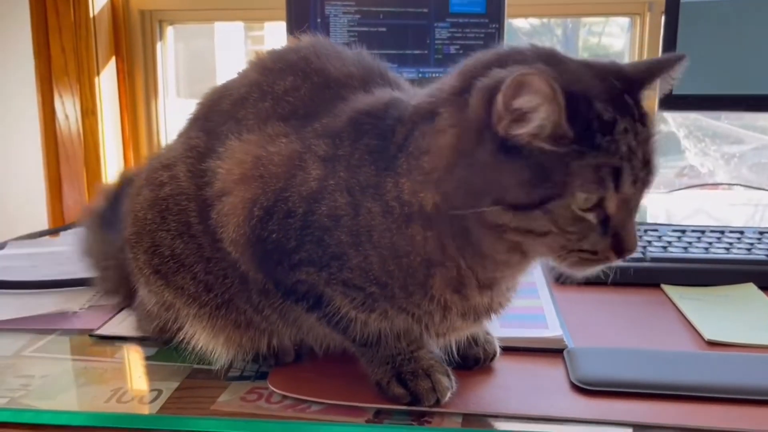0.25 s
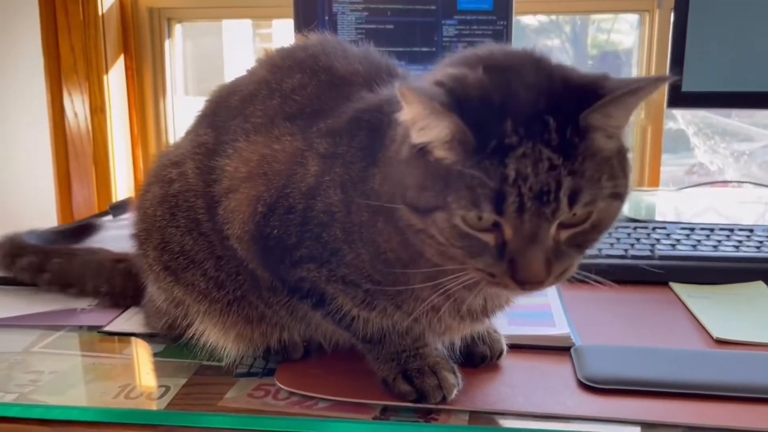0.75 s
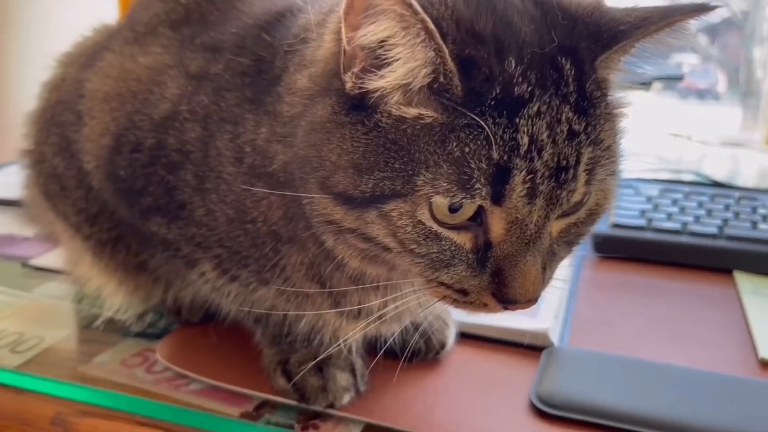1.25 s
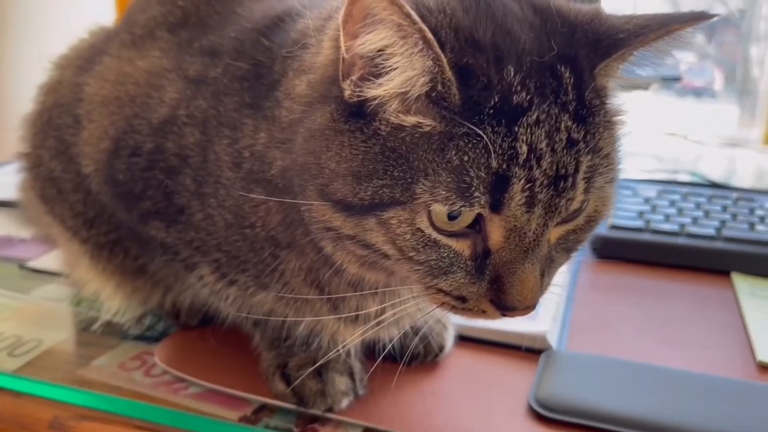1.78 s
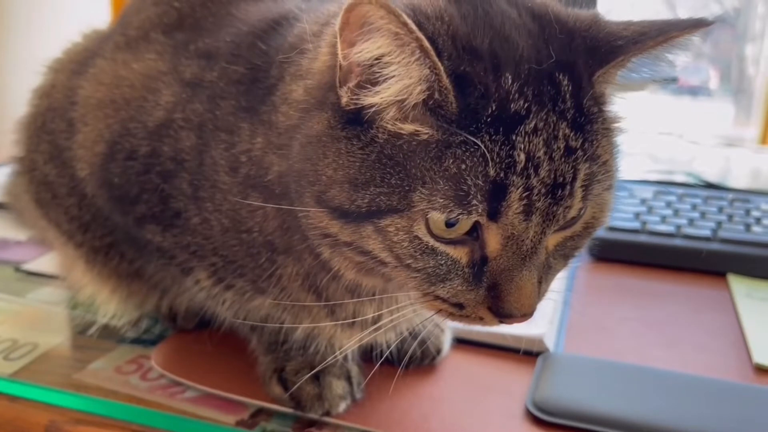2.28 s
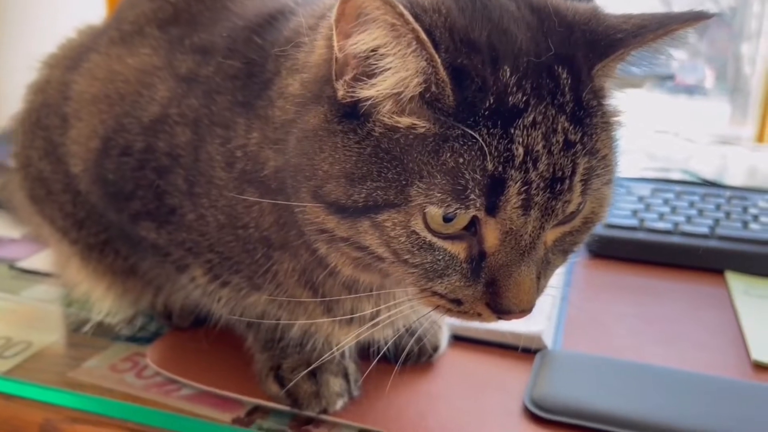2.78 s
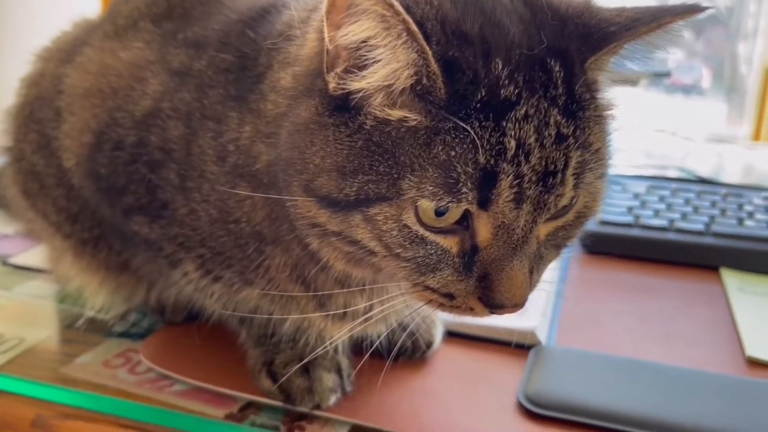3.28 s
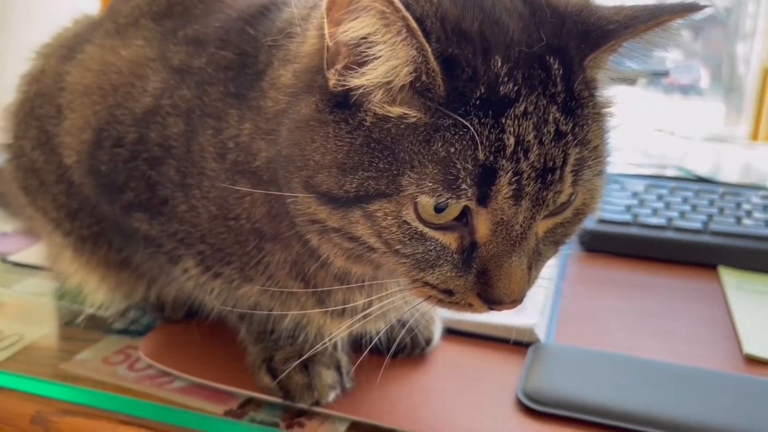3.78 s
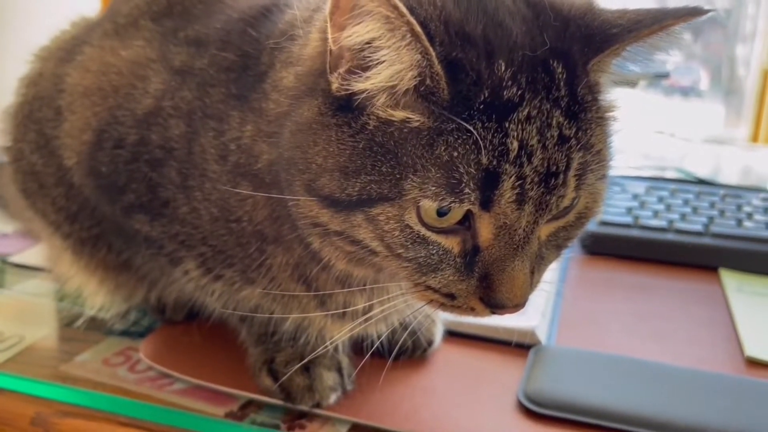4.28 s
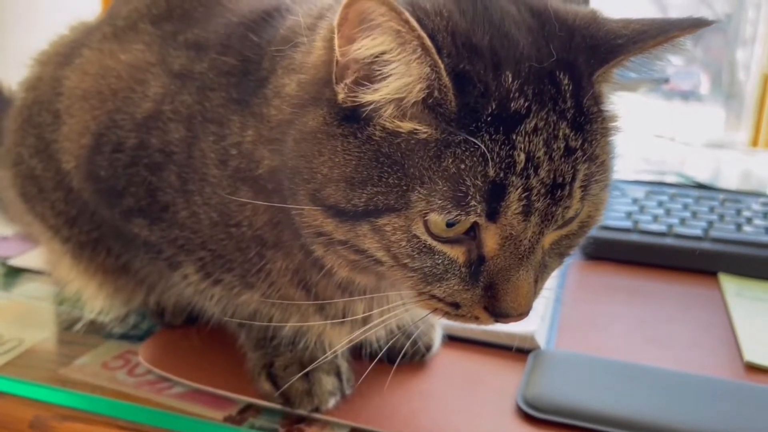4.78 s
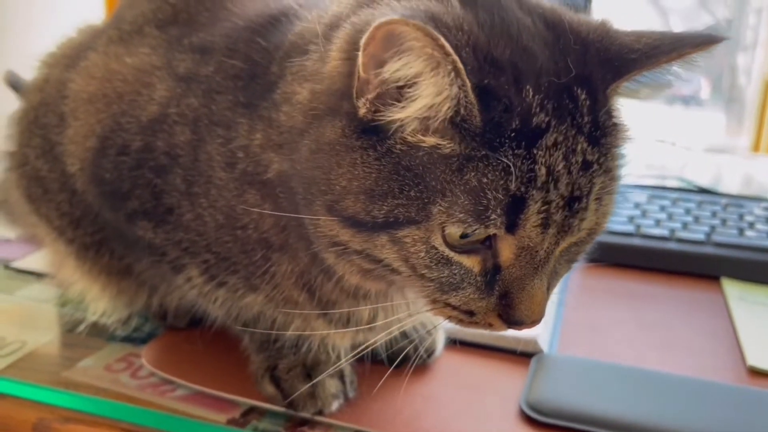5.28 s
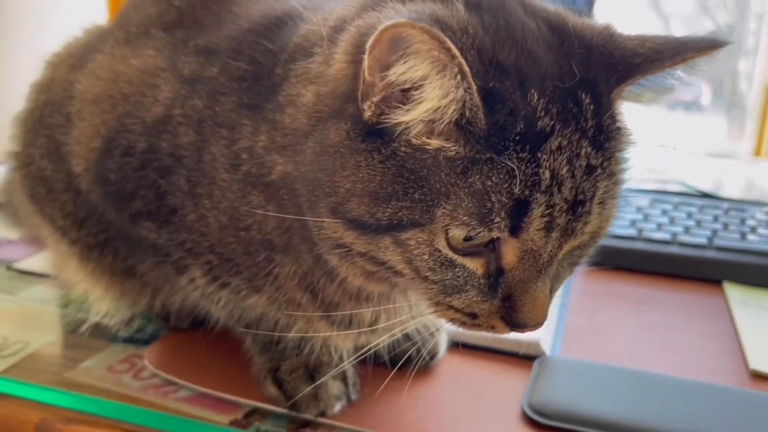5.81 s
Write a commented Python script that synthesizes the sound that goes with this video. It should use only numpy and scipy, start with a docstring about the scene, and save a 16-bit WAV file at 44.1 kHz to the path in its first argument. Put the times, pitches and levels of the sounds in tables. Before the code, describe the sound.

Indoors, heard from very near, a cat's low, fluttering purr rises and falls with its breathing. Fuller, rumbling out-breaths alternate three times with lighter in-breaths that hiss through the nose, above a faint room rumble. The sound cuts out for an instant early on. At the close come a dull bump and a short, grainy scrape that rings briefly, the loudest sound of all.

```python
"""A cat purring on a desk

Close to the microphone, the glottis opens and shuts about 26 times a second; each pulse excites the airway.
Outwards the purr is a deep throb; inwards it is softer, and turbulent puffs hiss through the nose.
Near the end come a soft thump and a loud scuff, both with damped ringing.
Fur rustles faintly over a low room rumble, and twice the sound drops out for a moment."""
import sys
import numpy as np
from scipy import signal
from scipy.fft import rfft, irfft, next_fast_len
from scipy.io import wavfile
from scipy.ndimage import uniform_filter1d, map_coordinates

SR = 44100
rng = np.random.default_rng(int(sys.argv[2]) if len(sys.argv) > 2 else 0)


def generate_wav(sig):
    """Save sig (samples, or channels by samples) to the path in sys.argv[1] as 16-bit PCM at SR."""
    pcm = np.round(np.clip(np.atleast_2d(sig).T, -1, 1) * 32767).astype(np.int16)
    wavfile.write(sys.argv[1], SR, pcm)


N = 266805
TIME = np.arange(N) / SR


# outward runs: first closure t/s, rate/Hz, cycles, relative chest and throat level/dB, swell depth/dB
OUTWARD_RUNS = [(.021, 25.35, 21, -63.2, -67.3, 4), (1.432, 25.05, 29, -54.7, -57.8, 6.5),
                (3.636, 25.37, 29, -54.2, -57.2, 10)]
# inward runs: first closure t/s, rate/Hz, cycles, relative chest, throat and hiss level/dB,
# full flow, fade and cut-off t/s after that closure, top whistle f/Hz, relative whistle and sibilance level/dB
INWARD_RUNS = [(.870, 25.8, 14, -58.5, -64.5, -65, -.01, .2, .46, 4210, -2.5, -8),
               (2.608, 25.8, 26, -59, -64.3, -61.7, .075, .3, .9, 4350, -1, -9),
               (4.797, 26.25, 27, -59.7, -65.3, -64.8, .115, .61, .78, 4420, -4, -1.5)]

def purr():
    """Source and filter: glottal pulses drive the body; the chest carries the bass, the throat the rest."""
    outward = [closures(run) for run in OUTWARD_RUNS]
    inward = [closures(run) for run in INWARD_RUNS]
    effort = np.vstack([*map(effort_out, OUTWARD_RUNS, outward), *map(effort_in, INWARD_RUNS, inward)])
    surge = amp(5.2 * bell(TIME - 0.477, width=0.03))
    chest, throat = surge * gains(effort[np.argsort(effort[:, 0])])
    throb = filtered(sum(map(throb_out, outward)) + sum(map(throb_in, inward)), body)
    bass = lowpass(throb, hz=170, power=8)
    voice = amp(-1.3) * chest * unit(bass) + amp(-1.34) * throat * unit(throb - bass)
    ticking = amp(-55.5) * np.sqrt(throat) * sum(map(fold_ticks, outward))
    breath = amp(-29.5) * throat * sum(map(sigh, outward))
    return voice + ticking + breath + hums() + sum(map(nose_hiss, INWARD_RUNS, inward))


def closures(run, jitter_s=0.00066):
    """Quasi-periodic oscillation: the times at which the folds shut, slightly uneven."""
    start, rate, count = run[:3]
    return start + np.arange(round(count)) / rate + jitter_s * rng.standard_normal(round(count))


def effort_out(run, t, crest=0.62, sag_db=3, throat_swing=1.64):
    """Amplitude envelope that swells, then sags: rows of t/s, chest level/dB, throat level/dB."""
    chest_db, throat_db, swell_db = run[3:]
    share, length = progress(run, t)
    rising = swell_db * (1 - share / crest) ** 2
    sagging = sag_db * ((share - crest) / (1 - crest)) ** 2
    soft_ends = edge(share * length, 0.19) + edge((1 - share) * length, 0.1)
    drop_db = np.where(share < crest, rising, sagging) + 5.5 * soft_ends
    return np.column_stack([t, chest_db - drop_db, throat_db - throat_swing * drop_db])


def effort_in(run, t, floor_db=-11):
    """Amplitude as a power law of airflow: rows of t/s, chest level/dB, throat level/dB."""
    chest_db, throat_db = run[3:5]
    flow_db = np.maximum(airflow(run, t), floor_db)
    return np.column_stack([t, chest_db + 0.42 * flow_db, throat_db + 0.53 * flow_db])


def airflow(run, t, open_db_per_s=142, fade_db_per_s=20.5, close_db_per_s=121):
    """Inward flow in dB: an exponential onset, a hold, a fade as the lungs fill, a quick release."""
    full_s, fade_s, cut_s = run[6:9]
    elapsed = t - run[0]
    return -(open_db_per_s * np.maximum(full_s - elapsed, 0)
             + fade_db_per_s * np.maximum(elapsed - fade_s, 0)
             + close_db_per_s * np.maximum(elapsed - cut_s, 0))


# spectrum of the outward throb: f/Hz, relative level/dB
THROB_OUT_SPECTRUM = [(20, -13.5), (40, 3.5), (52, 0.5), (75, -1.5), (100, -1), (127, 2.5), (172, -9),
                      (203, -1.5), (255, -9), (335, -9.5), (375, -11), (480, -35), (600, -49), (800, -39),
                      (1700, -110)]

def throb_out(shut):
    """Impulse excitation: the folds kick the airway as they part and, harder, as they meet."""
    opening = pulses(shut - 0.0158 + 0.001 * rng.standard_normal(len(shut)), scatter_db=2)
    closing = pulses(shut - 0.0006, scatter_db=0.64)
    flutter = puffs(shut - 0.006, width=0.014, scatter_db=0.5)
    source = unit(0.68 * opening + closing) + 0.46 * unit(flutter)
    return levelled(coloured(source, THROB_OUT_SPECTRUM), shut)


# spectrum of the inward throb: f/Hz, relative level/dB
THROB_IN_SPECTRUM = [(20, -14), (40, 8), (52, -2.5), (76, -4), (102, -7), (132, -4), (188, -6),
                     (290, -20.5), (355, -19), (470, -38), (800, -38.5), (1700, -110)]

def throb_in(shut):
    """Reversed polarity: inwards the kicks are inverted, less even, and stronger on opening."""
    opening = pulses(shut - 0.0185 + 0.00088 * rng.standard_normal(len(shut)), scatter_db=3.5)
    closing = pulses(shut + 0.00556, scatter_db=3)
    flutter = puffs(shut - 0.012, width=0.011, scatter_db=2)
    source = -unit(opening + 0.63 * closing) + 0.89 * unit(flutter)
    return levelled(coloured(source, THROB_IN_SPECTRUM), shut)


def body(f, cutoff_hz=35, lag_s=0.00974, lag_hz=180):
    """Dispersive high-pass: the bass of each kick trails its upper part, so the pitch falls."""
    phase = 2 * np.pi * lag_s * lag_hz * (1 - np.exp(-f / lag_hz))
    return np.exp(-1j * phase) * (1 - 1 / (1 + (f / cutoff_hz) ** 10))


# nasal resonances: f/Hz, bandwidth/Hz, relative level/dB with the folds open and as they snap shut
NOSE_FORMANTS = [(1060, 450, -14.5, -10.5), (2190, 480, -4, -3), (2573, 394, -1.5, 6.5),
                 (3060, 330, -7.5, -30), (3890, 570, -9, -22), (5050, 290, -15, -7), (5550, 94, -42, -25),
                 (7200, 980, -23, -14), (7990, 120, -16, -15)]
# spectrum of the broad sibilance: f/Hz, relative level/dB
SIBILANCE_SPECTRUM = [(1200, -43), (2600, 6), (3600, 1.5), (5200, 5), (6300, 0.5), (6600, -25.5),
                      (8200, -11), (10000, -32)]

def nose_hiss(run, shut):
    """Turbulence excites the nose: air rushes through open folds, spurts as they shut, then leaks."""
    hiss_db, *_, top_hz, whistle_db, sibilance_db = run[5:]
    centres, widths, open_db, snap_db = np.transpose(NOSE_FORMANTS)

    def through_nose(flow, levels):
        formants = list(zip(centres, widths, amp(levels)))
        response = lambda f: np.sqrt(sum((gain * resonance(f, hz, w)) ** 2 for hz, w, gain in formants))
        return unit(filtered(turbulent(flow), response))

    rush = unit(swells(shut - 0.0078, width=0.0036, scatter_db=2))
    slit = swells(shut + 0.0005, width=0.0019, scatter_db=1.3)
    spurt = unit(np.hypot(slit, 0.2 * swells(shut + 0.005, width=0.004, scatter_db=1)))
    leak = 0.35 * unit(swells(shut + 0.016, width=0.011, scatter_db=1))
    hiss = unit(through_nose(np.hypot(rush, leak), open_db) + through_nose(spurt, snap_db))
    flow = np.sqrt((0.5 * rush) ** 2 + spurt ** 2 + leak ** 2)
    whistle = amp(whistle_db) * nostril_whistle(run, flow, top_hz)
    sibilance = amp(sibilance_db) * unit(coloured(turbulent(flow), SIBILANCE_SPECTRUM))
    air = levelled(wandering_tilt(hiss + whistle + sibilance), shut)
    return brightened(air, hiss_db + airflow(run, TIME))


def nostril_whistle(run, flow, top_hz, crest=0.28, sag_hz=439):
    """Narrow-band noise on the nostril's resonance, which peaks early in the run and then sinks."""
    band = filtered(turbulent(flow), lambda f: resonance(f, 0, width=300))
    share, _ = progress(run, TIME)
    hz = top_hz - sag_hz * ((share - crest) / (1 - crest)) ** 2
    return unit(band * np.sin(2 * np.pi * np.cumsum(hz) / SR))


def wandering_tilt(hiss, depth_db=1.3, knots_per_s=20):
    """Random spectral tilt: the hiss leans to the lower or the upper nasal resonances."""
    knots = rng.standard_normal(int(TIME[-1] * knots_per_s) + 4)
    tilt_db = depth_db * map_coordinates(knots, [TIME * knots_per_s])
    low = lowpass(hiss, hz=3250, power=12)
    return amp(-tilt_db) * low + amp(tilt_db) * (hiss - low)


def brightened(hiss, level_db, treble_db_per_db=0.47, neutral_db=-63.5):
    """Faster flow is brighter: the hiss follows its level, the treble more steeply than the rest."""
    low = lowpass(hiss, hz=6650, power=12)
    treble_gain = amp(treble_db_per_db * (level_db - neutral_db))
    return amp(level_db) * (low + treble_gain * (hiss - low))


# spectrum of the air leaving the nose: f/Hz, relative level/dB
SIGH_SPECTRUM = [(600, -8), (1200, 3), (1900, -11.5), (2550, 5), (3100, -17), (7000, -22.5), (8400, -1),
                 (9500, -13.5), (11500, -11), (13000, -29)]

def sigh(shut):
    """Pulsed turbulence: a faint puff leaves the nose in each outward cycle."""
    return levelled(coloured(puffs(shut + 0.0063, width=0.012, scatter_db=3.5), SIGH_SPECTRUM), shut)


# spectrum of the closing folds' tick: f/Hz, relative level/dB
TICK_SPECTRUM = [(300, -4.5), (700, -8.5), (1250, 0.5), (1600, -6.5), (2000, -27), (2500, -14), (3200, -32),
                 (6000, -44)]

def fold_ticks(shut):
    """Contact noise: the moist folds meet with a tick, just after a softer, longer burst."""
    snap = unit(puffs(shut, width=0.00079, scatter_db=0.5))
    lead_in = unit(puffs(shut - 0.012, width=0.008, scatter_db=3.5))
    return levelled(coloured(snap + 0.5 * lead_in, TICK_SPECTRUM), shut)


# the strongest wet ticks in the throat: t/s, level/dB
WET_TICKS = [(.064, -70.5), (1.752, -68), (1.836, -66.5), (2.150, -71), (4.072, -66), (4.188, -67.5),
             (4.465, -70), (4.542, -74)]

def wet_ticks():
    """Adhesion: now and then the folds stick and tick more loudly."""
    envelope = sum(amp(db) * bell(TIME - s, width=0.0017) for s, db in WET_TICKS)
    return envelope * unit(coloured(rng.standard_normal(N), TICK_SPECTRUM))


# brief tones in the purr: t/s, width/s, f/Hz, level/dB
HUM_TONES = [(1.6, .05, 148, -56), (2.21, .0025, 620, -66)]

def hums():
    """Tone bursts: soft sinusoids under Gaussian envelopes."""
    return sum(amp(db) * bell(TIME - s, width) * np.sin(2 * np.pi * hz * TIME)
               for s, width, hz, db in HUM_TONES)


# spectrum of the scrape: f/Hz, relative level/dB
GRIT_SPECTRUM = [(35, -55), (60, -9), (128, -13), (234, -1.5), (358, -2), (419, -10.5), (490, -0.5),
                 (626, -10.5), (819, -7), (1400, -12.5), (2140, -14.5), (3740, -25), (7820, -28.5),
                 (12500, -38), (16200, -55), (22000, -120)]

def scuff():
    """Friction noise: a brief grainy scrape whose treble dies first, over a ringing hollow body."""
    grains = unit(rng.standard_normal(N) * (rng.random(N) < 0.3))
    grit = unit(coloured(grains, GRIT_SPECTRUM))
    treble = grit - lowpass(grit, hz=5500, power=6)
    dulling = np.clip((TIME - 5.875) / 0.16, 0, 0.88)
    return scuff_envelope() * (grit - dulling * treble) + hollow_ring()


def scuff_envelope(start_s=5.829, bite_s=0.0022, build_s=0.036, crest_db=-29):
    """Double-slope decay: the scuff bites, builds to a crest, dies fast and leaves a slower tail."""
    t = np.maximum(TIME - start_s, 0)
    attack = (1 - edge(t, bite_s)) * amp(crest_db - 4 * edge(t, build_s))
    dying = np.maximum(t - build_s, 0)
    return attack * np.hypot(amp(-190 * dying), amp(-13 - 57 * dying))


# modes of the hollow body: f/Hz, relative level/dB, T60/s
HOLLOW_MODES = [(240, -8, 0.38), (354, 15.5, 0.15), (480, -1, 0.18), (805, -12, 0.11), (944, -5, 0.11),
                (1051, 1, 0.22), (1142, -1, 0.3), (1315, 2, 0.33), (1654, 4, 0.17), (2080, 5.5, 0.11),
                (2920, -1.5, 0.18)]

def hollow_ring(start_s=5.836, rise_s=0.0047):
    """Free vibration: each mode of the scraped body decays exponentially."""
    t = np.maximum(TIME - start_s, 0)
    ring = sum(amp(db - 60 * t / t60) * np.sin(2 * np.pi * (hz * t + rng.random()))
               for hz, db, t60 in HOLLOW_MODES)
    return amp(-39) * ring * (1 - np.exp(-t / rise_s))


# modes of the thump's knock: f/Hz, level/dB, T60/s
KNOCK_MODES = [(290, -41, 0.046), (544, -46.5, 0.041), (910, -42, 0.018), (1170, -63, 0.056),
               (3350, -51, 0.01)]

def thump(start_s=5.704, boom_hz=52, glide_hz=70):
    """Soft impact: damped modes give a short knock, then a boom sinks in pitch."""
    t = np.maximum(TIME - start_s, 0)
    pitch_hz = boom_hz + glide_hz * np.exp(-t / 0.015)
    phase = 2 * np.pi * np.cumsum(pitch_hz * (t > 0)) / SR
    swell = bell(np.log((t + 1e-9) / 0.019), width=0.5)  # log-normal, peaking after 19 ms
    boom = -0.5 * np.cos(phase) * swell
    knock = sum(amp(db - 60 * t / t60) * np.sin(2 * np.pi * hz * t) for hz, db, t60 in KNOCK_MODES)
    return amp(-30) * boom + knock * (1 - np.exp(-t / 0.0011))


# fur brushing on fur: t/s, width/s, level/dB
FUR_RUSTLES = [(0.134, .045, -83), (0.641, 0.081, -84), (5.088, 0.018, -81), (5.258, .015, -88),
               (5.68, 0.04, -85.5)]

def fur():
    """Friction between hairs: faint swells of high noise."""
    spectrum = [(5000, -30), (7500, -8), (8800, 3), (11500, -1), (12600, -11)]
    envelope = sum(amp(db) * bell(TIME - s, width) for s, width, db in FUR_RUSTLES)
    return envelope * unit(coloured(rng.standard_normal(N), spectrum))


# small dry clicks: t/s, level/dB
DRY_CLICKS = [(0.84, -58.5), (5.704, -62)]

def clicks(t60=0.017):
    """Broadband transients: noise that starts at once and decays exponentially."""
    spectrum = [(200, 5), (1200, -0.5), (3300, -3.5), (4200, -7), (9000, -19)]
    envelope = sum(amp(db - 60 * np.abs(TIME - s) / t60) * (TIME > s) for s, db in DRY_CLICKS)
    return envelope * unit(coloured(rng.standard_normal(N), spectrum))


# spectrum of the background: f/Hz, relative level/dB
ROOM_SPECTRUM = [(20, -8), (33, 0), (40, 26.5), (46, 26.5), (54, 12), (160, 14), (300, 8.5), (500, -3),
                 (1000, -9), (2000, -16), (4000, -19), (7000, -19), (8500, -17.5), (10000, -21.5),
                 (11500, -20.5), (13000, -37.5)]
# tones of the electronics: f/Hz, relative level/dB
WHINE_TONES = [(7897, -100), (8683, -99), (9211, -105)]

def room():
    """Stationary noise floor: low rumble, faint hiss and the line spectrum of the desk's electronics."""
    whine = sum(amp(db) * np.sqrt(2) * np.sin(2 * np.pi * hz * TIME) for hz, db in WHINE_TONES)
    return amp(-67.5) * unit(coloured(rng.standard_normal(N), ROOM_SPECTRUM)) + amp(2) * whine


def amp(db):
    """Decibels to amplitude ratio."""
    return 10 ** (np.asarray(db) / 20)


def unit(x):
    """Normalisation to rms 1."""
    return x / np.sqrt(np.mean(x ** 2) + 1e-20)


def levelled(x, times):
    """Normalisation to rms 1 over a run of cycles."""
    return unit(x) * np.sqrt((times[-1] - times[0]) * SR / N)


def gains(rows):
    """Interpolation of rows of t/s, levels/dB into one gain curve per level."""
    times, *levels = np.transpose(rows)
    return [amp(np.interp(TIME, times, db)) for db in levels]


def progress(run, t):
    """Share of a run that has passed at times t, and its length in s."""
    start, rate, count = run[:3]
    length = (round(count) - 1) / rate
    return np.clip((t - start) / length, 0, 1), length


def edge(elapsed, length):
    """Linear ramp from 1 to 0."""
    return np.clip(1 - elapsed / length, 0, 1)


def bell(x, width):
    """Gaussian with standard deviation `width`."""
    return np.exp(-(x / width) ** 2 / 2)


def pulses(times, scatter_db):
    """Impulse train with log-normal amplitudes."""
    index = np.clip(np.round(times * SR).astype(int), 0, N - 1)
    return np.bincount(index, amp(scatter_db * rng.standard_normal(len(times))), N)


def swells(times, width, scatter_db):
    """Convolution puts a Gaussian swell of uneven size around each time."""
    t = np.arange(-(SR // 20), SR // 20 + 1) / SR
    return signal.oaconvolve(pulses(times, scatter_db), bell(t, width), "same")


def turbulent(flow):
    """White noise, amplitude-modulated by a flow of air."""
    return flow * rng.standard_normal(N)


def puffs(times, width, scatter_db):
    """A noise burst around each time."""
    return turbulent(swells(times, width, scatter_db))


def resonance(f, hz, width):
    """Lorentzian gain curve centred on hz."""
    return 1 / (1 + (2 * (f - hz) / width) ** 2)


def filtered(x, response):
    """Filtering as multiplication of the spectrum by a frequency response."""
    size = next_fast_len(N + SR // 2)
    return irfft(rfft(x, size) * response(np.fft.rfftfreq(size, 1 / SR)), size)[:N]


def lowpass(x, hz, power):
    """Zero-phase low-pass; above hz the gain falls as f ** -power."""
    return filtered(x, lambda f: 1 / (1 + (f / hz) ** power))


def coloured(x, spectrum, size=16384):
    """Minimum-phase filter through points of f/Hz, level/dB, joined on a log frequency axis."""
    hz, db = np.transpose(spectrum)
    curve_db = np.interp(np.log(np.fft.rfftfreq(size, 1 / SR) + 1), np.log(hz + 1), db)
    cepstrum = irfft(np.log(amp(curve_db)))
    cepstrum[1:size // 2] *= 2  # folding the cepstrum makes the filter causal
    cepstrum[size // 2 + 1:] = 0
    impulse_response = irfft(np.exp(rfft(cepstrum)))[:size // 2]
    return signal.oaconvolve(x, impulse_response)[:N]


def scene():
    """Superposition of all sources at one microphone."""
    return (purr() + wet_ticks() + fur() + clicks() + thump() + scuff() + room())[None]


# silences: start t/s, end t/s
SILENCES = [(.891, .957), (5.945, 5.973)]

def record(dry, notch_hz=10200, top_hz=12600):
    """Gating and filtering: two dropouts, then the microphone's narrow treble notch and band limit."""
    live = np.prod([(TIME < start) | (TIME > end) for start, end in SILENCES], axis=0)
    gate = uniform_filter1d(live.astype(float), size=40)
    notch = lambda f: 1 - 0.95 * bell(f - notch_hz, width=280)
    band_limit = lambda f: np.clip((top_hz - f) / 200 + 0.5, 0, 1)
    return filtered(dry[0] * gate, lambda f: notch(f) * band_limit(f))[None]


dry = scene()
out = record(dry)
generate_wav(out)
```